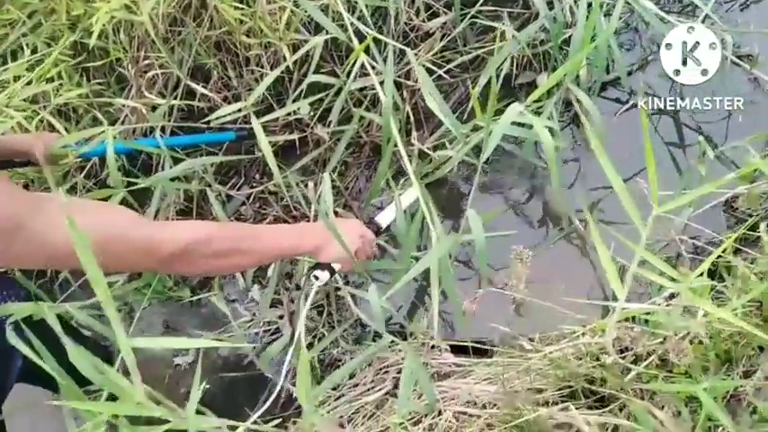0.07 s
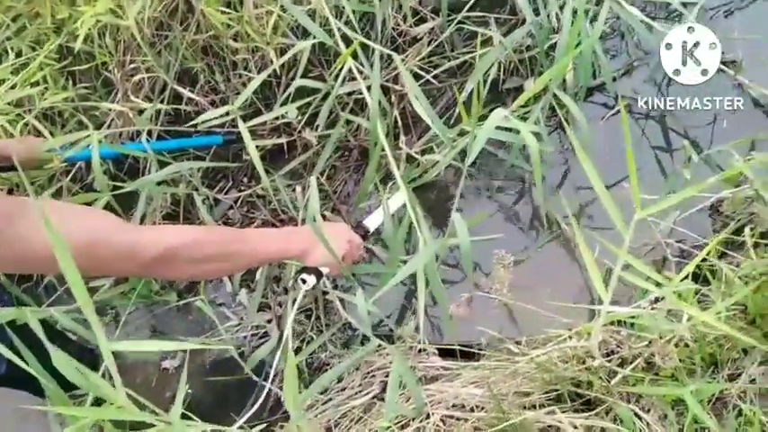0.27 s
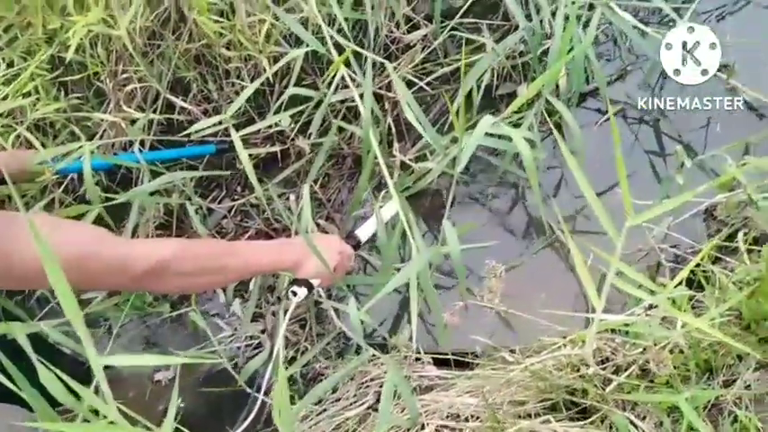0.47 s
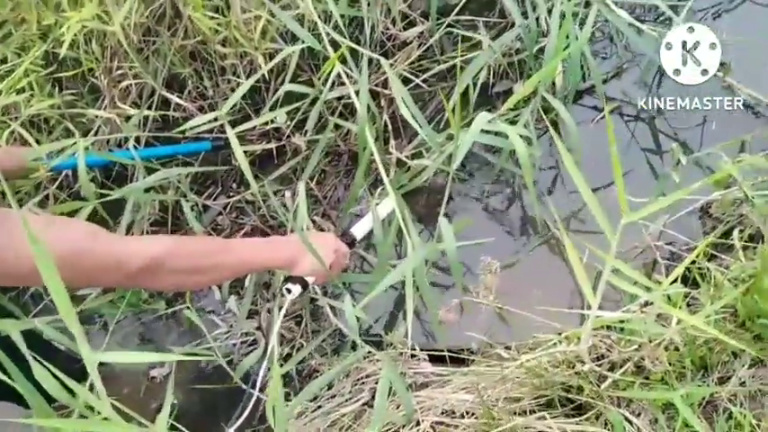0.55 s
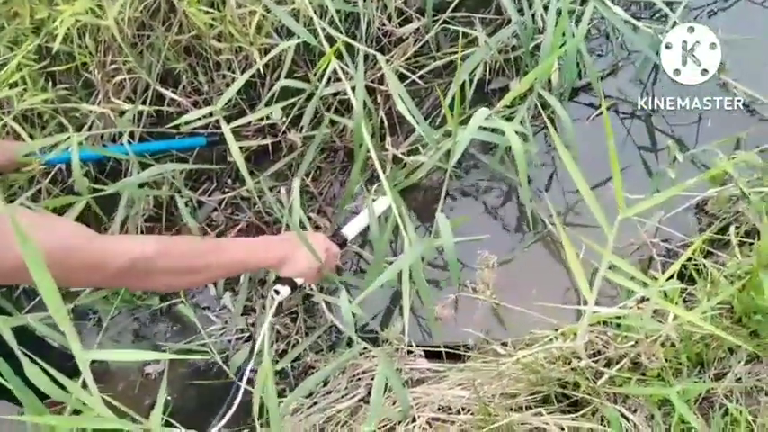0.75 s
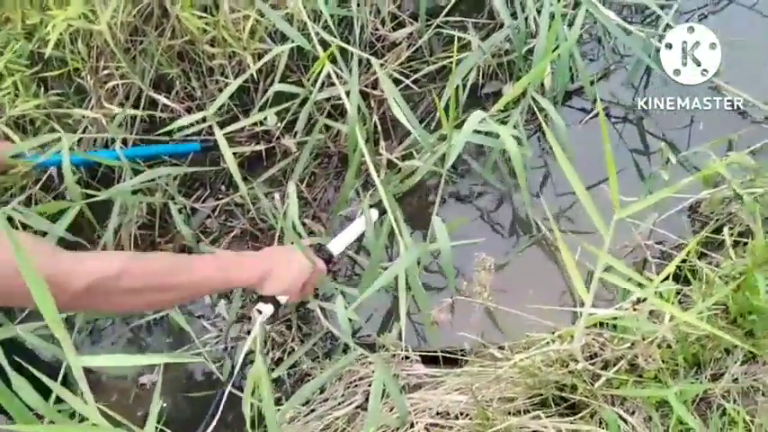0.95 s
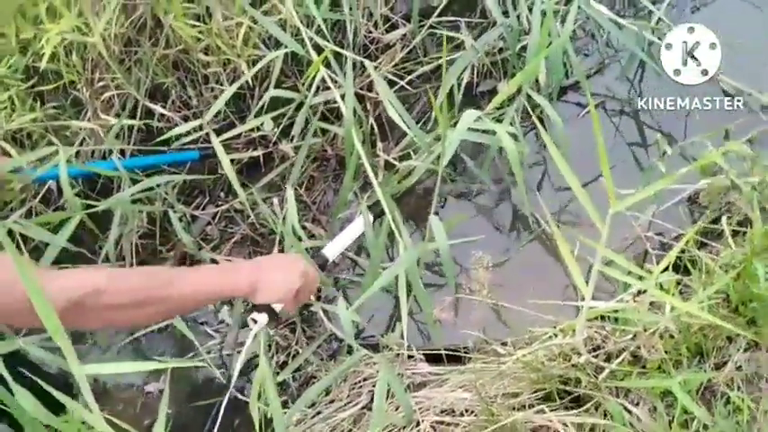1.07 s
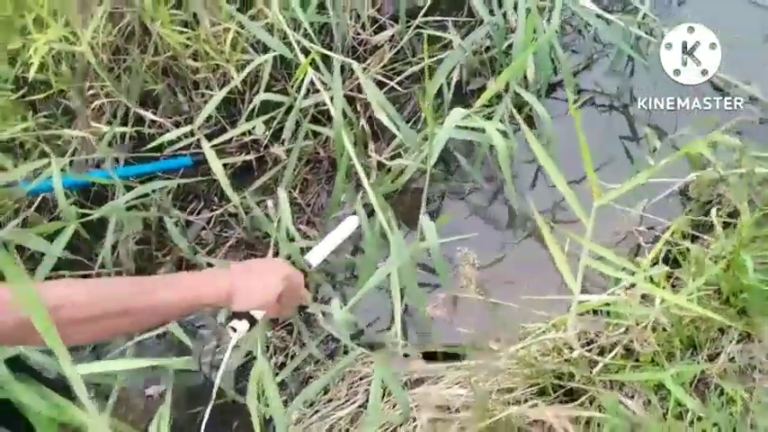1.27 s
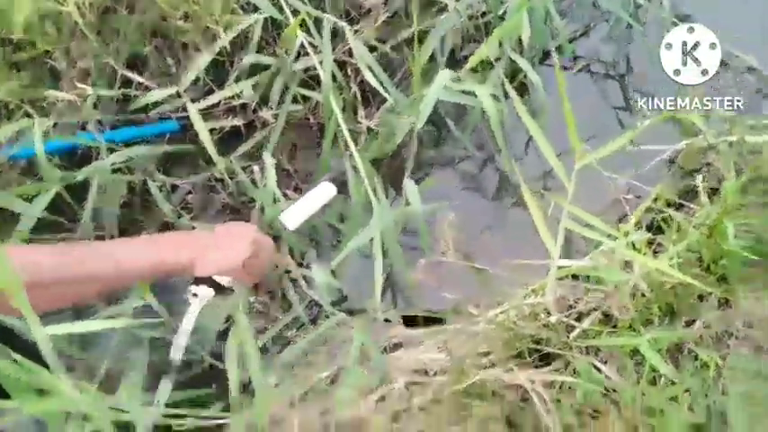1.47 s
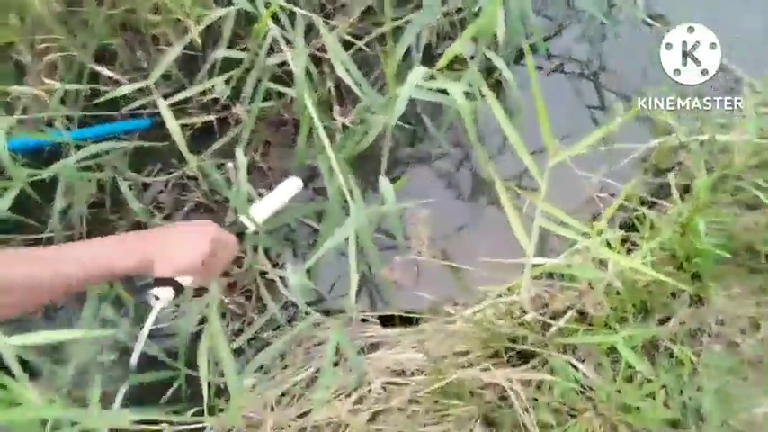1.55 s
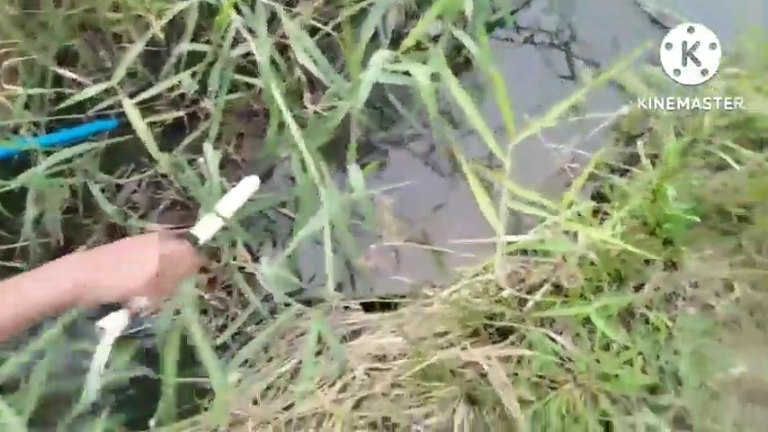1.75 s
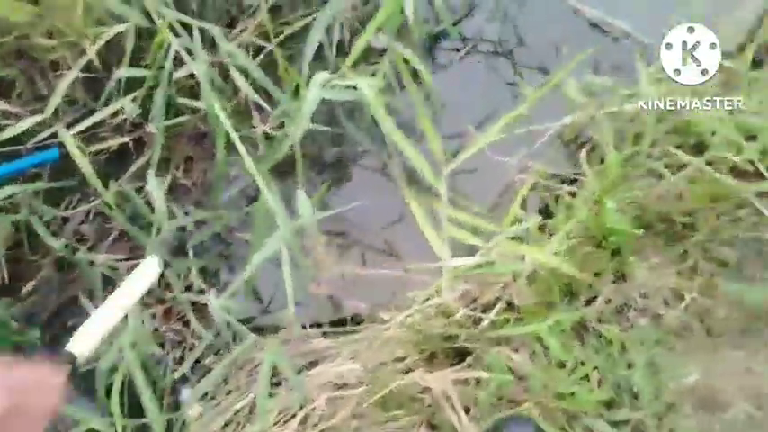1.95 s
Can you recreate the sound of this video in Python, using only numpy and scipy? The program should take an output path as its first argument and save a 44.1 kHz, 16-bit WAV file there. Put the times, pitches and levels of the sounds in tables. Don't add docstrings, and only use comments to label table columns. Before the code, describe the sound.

A harsh electric buzz from a homemade shocker dominates. Until 0.19 s there is only faint grass rustle, a thin throbbing insect and low distant rumble. The dry, metallic rattle then starts, peaks near 0.3 s, flutters unevenly with a slight coil hum, and gradually weakens until stopping at 1.72 s. A soft pole knock at 1.75, a short grass swish at 1.85, tiny bright clicks from 1.87 to 1.95, and a last dull knock follow.

```python
import sys
import numpy as np
from scipy import signal
from scipy.io import wavfile

SR = 44100
rng = np.random.default_rng(int(sys.argv[2]) if len(sys.argv) > 2 else 0)


def elevation(decibels):
    levels = np.asarray(decibels, float)
    return 10 ** (levels / 20)


def to_wav(s):
    ch = np.atleast_2d(s).T
    pcm = np.round(np.clip(ch, -1, 1) * 32767)
    wavfile.write(sys.argv[1], SR, pcm.astype(np.int16))


N = 88200

# (time [s], level [dB], extra path [ms])
RATTLE_PATH = [(.192, -41.5, 0.16), (.2, -29.5, .15), (.225, -25, 0.23), (.3, -19.5, 0.16),
               (.4, -20.5, 0.13), (.5, -20.5, 0.23), (.55, -21, 0.18), (.6, -21.5, 0.16),
               (.64, -22.5, 0.27), (.68, -21, 0.15), (.8, -22.5, 0.17), (.9, -22.5, 0.26),
               (1.0, -23.5, 0.4), (1.2, -24, 0.76), (1.4, -25.5, 0.7), (1.55, -28, 0.41), (1.65, -30, 0.58),
               (1.72, -31.5, 0.25)]
# (first hard strike [s], hard strikes [count], hard-to-soft [dB])
STRIKE_RUNS = [(0.1925, 2, 13.5), (0.2091, 1, 18.3), (0.2191, 11, 10.5), (0.2957, 5, 6.2), (0.3323, 1, 7.7),
               (0.3489, 9, 7.0), (0.4121, 1, 1.7), (0.4221, 3, 6.6), (0.4454, 3, 7.2), (0.4621, 4, 5.5),
               (0.4953, 1, 3.3), (0.5053, 3, 6.4), (0.5819, 1, 4.8), (0.5918, 3, 7.4), (0.6151, 2, 5.7),
               (0.6318, 1, 3.2), (0.6484, 1, 4.2), (0.6584, 2, 8.8), (0.6684, 2, 9.2), (0.6784, 3, 8.2),
               (0.7017, 2, 4.8), (0.7116, 8, 6.3), (0.7616, 5, 6.3), (0.8048, 3, 13.9), (0.8215, 10, 6.9),
               (0.908, 7, 5.5), (0.9779, 3, 6.1), (1.0012, 2, 8.6), (1.0111, 1, 4.7), (1.0211, 4, 3.4),
               (1.0444, 27, 5.1), (1.2274, 3, 7.3), (1.2507, 1, 1.5), (1.2607, 4, 6.9), (1.304, 8, 9.7),
               (1.3805, 8, 6.4), (1.4371, 5, 4.4), (1.4737, 21, 4.8), (1.6201, 2, 4.4), (1.6368, 4, 7.7),
               (1.6667, 7, 8.7), (1.72, 1, 6.2)]
# (frequency [Hz], left level [dB], right level [dB], 60 dB decay time [s])
BOX_MODES = [(5610, 0.5, -15.5, 0.0027), (6252, 3.5, -9, 0.0059), (7022, -20, 1.5, 0.0062),
             (8275, -2, -5, 0.0047), (9820, -53, 4, 0.0017), (10586, -3, -3, 0.0029),
             (11640, -17, -9.5, 0.017), (14200, -37, -43, 0.0025)]
# (frequency [Hz], left level [dB], right level [dB], decay time [s])
CRACK_MODES = [(5735, -2, -0.5, 0.0012), (7316, -1.5, -10, 0.0016), (10557, -4.5, -12.5, 0.0023),
               (12260, -12, -22, 0.0011), (13470, -37, -30, 0.0017)]
# (frequency [Hz], level [dB], 60 dB decay time [s])
CASE_MODES = [(1360, 9, 0.0015), (2160, -6, 0.0091), (3180, -6, 0.0025), (3850, 12, 0.0093),
              (4046, -2.5, 0.014)]
# (multiple of the strike rate [count], level [dB])
HUM_MULTIPLES = [(1, -43), (2, -62.5), (3, -51.5), (4, -64), (5, -40.5), (6, -49), (7, -53.5), (8, -55.5),
                 (9, -107), (10, -55)]
# (time [s], peak level [dB], frequency [Hz])
POLE_KNOCKS = [
    (1.753, -28.5, 327),
    (1.834, -49, 376),
    (1.994, -36.5, 354),
]
# (time [s], peak level [dB], frequency [Hz])
STEM_CLICKS = [
    (1.8721, -25, 7650),
    (1.882, -21, 6850),
    (1.9278, -21, 7100),
    (1.9424, -26, 6900),
    (1.949, -20.5, 6360),
]
# (frequency [Hz], level [dB])
RUSTLE_COLOUR = [(180, -50), (300, 3.5), (401, -6), (1580, -11), (1800, -7), (3060, -4.5), (5570, -3.5),
                 (6040, -0.5), (14200, -8)]
# (time [s], level [dB])
GRASS_LEVEL = [(0, -52), (.08, -60), (.13, -66), (.19, -68), (.25, -57), (.4, -52), (.9, -46), (1.4, -43),
               (1.74, -40), (1.81, -40), (1.85, -38), (1.92, -40.5), (2, -41)]
# (frequency [Hz], level [dB])
RUMBLE_COLOUR = [(15, -69), (25, -24), (81, -2.5), (108, 7.5), (155, -1.5), (179, 5), (401, -11.5),
                 (522, -67), (700, -74), (910, -77), (1540, -120)]
# (time [s], level [dB])
RUMBLE_SWELL = [
    (0, -55),
    (.3, -57.5),
    (.7, -52),
    (1.2, -50),
    (1.5, -50),
    (1.7, -53),
    (2, -52),
]

ON_S, OFF_S, STRIKE_HZ = .1925, 1.7235, 300.5
LEFT_LAG_S = .00039


def rms_one(x):
    return x / np.sqrt(np.mean(x ** 2) + 1e-20)


def in_time(rows, s):
    t, *columns = np.transpose(rows)
    return [np.interp(s, t, c) for c in columns]


def drift(rate_hz):
    every = 40
    r = np.exp(-2 * np.pi * every * rate_hz / SR)
    noise = rng.standard_normal(N // every + 2002)
    slow = signal.lfilter([1], [1, -2 * r, r * r], noise)[2000:]
    return np.interp(np.arange(N) / every, np.arange(len(slow)), rms_one(slow))


def ring(push, hz, t60):
    r = elevation(-60 / (t60 * SR))
    w = 2 * np.pi * hz / SR
    return signal.lfilter([0, np.sin(w)], [1, -2 * r * np.cos(w), r * r], push + 1e-18)


def train(s, size):
    out = np.zeros(N)
    spots = np.round(np.asarray(s) * SR).astype(int)
    np.add.at(out, np.clip(spots, 0, N - 1), size)
    return out


def banded(source, colour, alike_hz, patchy_db):
    out, edges, points = 0, 22 * 2 ** np.arange(0, 9.6, .5), np.array(colour)
    for k, (low, high) in enumerate(zip(edges, edges[1:])):
        hz = np.sqrt(low * high)
        if points[0, 0] <= hz <= points[-1, 0]:
            band = signal.butter(2, [low, high], "band", fs=SR, output="sos")
            mid, side = signal.sosfilt(band, source[k % 2])
            alike = .95 / (1 + (hz / alike_hz) ** 2)
            level_db = np.interp(np.log(hz), np.log(points[:, 0]), points[:, 1])
            gain = elevation(level_db + patchy_db * drift(17))
            out = out + gain * (np.sqrt(1 + alike) * mid + np.sqrt(1 - alike) * side * [[1], [-1]])
    return rms_one(out)


def rattle():
    s, db = strikes()
    box = struck(BOX_MODES, s + .0002, db + 4.5, spread_s=.00004, wander_db=1.9, order=1)
    crack = struck(CRACK_MODES, s, db + 21, spread_s=0, wander_db=.5, order=2)
    treble = signal.cheby2(8, 40, 4550, "high", fs=SR, output="sos")
    out = signal.sosfilt(treble, box + crack)
    case_modes = [(hz, d, d - 2.5, t60) for hz, d, t60 in CASE_MODES]
    case_db = 0.46 * (db + 23) - 35
    case = struck(case_modes, s, case_db, spread_s=.00031, wander_db=3.5, order=1)
    out += signal.sosfilt(signal.butter(2, [1100, 4400], "band", fs=SR, output="sos"), case)
    return out + scattered(out)


def strikes():
    hard_share = .45
    k = np.arange(int((OFF_S - ON_S) * STRIKE_HZ) + 1)
    jitter, scatter = rng.standard_normal((len(k), 2)).T
    swing = np.full(len(k) + 3, np.nan)
    for first_s, hard, uneven_db in STRIKE_RUNS:
        first = int(round((first_s - ON_S) * STRIKE_HZ))
        end = first + 2 * int(hard)
        if first > 1 and swing[first - 2] < 0:
            swing[first - 1] = swing[first - 2]
        swing[first:end:2] = hard_share * uneven_db
        swing[first + 1:end:2] = (hard_share - 1) * uneven_db
    swing = np.nan_to_num(swing[:len(k)])
    s = ON_S + k / STRIKE_HZ
    level_db, path_ms = in_time(RATTLE_PATH, s)
    late_ms = path_ms + .03 * jitter + .17 * swing / 10
    s = s - .0003 + late_ms / 1000
    scatter_db = 1.5 * scatter * (0.67 + np.clip(-swing / 4, 0, 1))
    return s, level_db + swing + scatter_db


def struck(modes, s, db, spread_s, wander_db, order):
    facing_s, facing_span_s, facing_hz, facing_peak_db = .99, .29, 8380, 7.5
    lean_left_db = .4
    out = np.zeros((2, N))
    for k, (hz, left_db, right_db, t60) in enumerate(modes):
        away = ((s - facing_s) / facing_span_s) ** 2 + (np.log(hz / facing_hz) / .041) ** 2
        wander = wander_db * drift(10.6)[(s * SR).astype(int)]
        share_db = facing_peak_db * np.exp(-away) + wander + 1.2 * rng.standard_normal(len(s))
        size = (-1) ** k * elevation(db + share_db)
        late = s + spread_s * rng.random(len(s))
        rung = ring(np.array([train(late, size), train(late - LEFT_LAG_S, size)]), hz, t60)
        for _ in range(order):
            rung = swell(rung, hz)
        out += elevation([[left_db + lean_left_db], [right_db - lean_left_db]]) * rung
    return out


def swell(x, hz):
    contact_t60_s = .0021
    return 2 * (1 - elevation(-60 / (contact_t60_s * SR))) * ring(x, hz, contact_t60_s)


def scattered(x):
    t60_s, tail_db = .04, -7.5
    t = np.arange(SR // 5) / SR
    tail = rng.standard_normal((2, len(t))) * elevation(-60 * t / t60_s) * (t > .001)
    tail /= np.sqrt(np.sum(tail ** 2, axis=1, keepdims=True))
    return elevation(tail_db) * signal.fftconvolve(x, tail, axes=1)[:, :N]


def hum():
    grows_db_per_s, waver_db = 6.0, 2.43
    t = np.arange(N) / SR
    on = np.clip((t - ON_S) / 0.072, 0, 1) * np.clip((OFF_S - t) / 0.0069, 0, 1)
    path_s = in_time(RATTLE_PATH, t)[1] / 1000
    heard = np.array([t - path_s, t - path_s + LEFT_LAG_S])
    out = 0
    for m, db in HUM_MULTIPLES:
        growth_db = (m > 1) * grows_db_per_s * (t - 1.5)
        gain = elevation(db - 2.5 + growth_db + waver_db * drift(37))
        out = out + gain * np.sin(2 * np.pi * (m * STRIKE_HZ * heard + rng.random()))
    return on * out


def small_hits():
    clicks = sum(ring(train([s], elevation(db)), hz, .0056) for s, db, hz in STEM_CLICKS)
    knocks = sum(ring(train([s], elevation(db)), hz, .03) for s, db, hz in POLE_KNOCKS)
    return clicks * elevation([[-1.5], [-5.5]]) + signal.lfilter([.1], [1, -.9], knocks)


def swish():
    middle_s, span_s, level_db = 1.846, .0072, -32
    t = np.arange(N) / SR
    hiss = rms_one(ring(rng.standard_normal((2, N)), 6260, .012))
    return elevation(level_db) * np.exp(-((t - middle_s) / span_s) ** 2 / 2) * hiss


def grass():
    snaps_per_s, snap_share = 1300, .24
    snaps = (rng.random((2, 2, N)) < snaps_per_s / SR) * rng.laplace(size=(2, 2, N))
    source = rng.standard_normal((2, 2, N)) + snap_share * rms_one(snaps)
    level_db = in_time(GRASS_LEVEL, np.arange(N) / SR)[0]
    return elevation(level_db) * banded(source, RUSTLE_COLOUR, alike_hz=800, patchy_db=1.54)


def insect():
    centre_hz, half_width_hz, throb_hz, level_db = 7650, 510, 58, -47
    edges = [centre_hz - half_width_hz, centre_hz + half_width_hz]
    sos = signal.butter(2, edges, "band", fs=SR, output="sos")
    throb = 1 + 0.25 * np.sin(2 * np.pi * throb_hz * np.arange(N) / SR)
    return elevation(level_db) * rms_one(throb * signal.sosfilt(sos, rng.standard_normal((2, N))))


def rumble():
    level_db = in_time(RUMBLE_SWELL, np.arange(N) / SR)[0]
    noise = rng.standard_normal((2, 2, N))
    return elevation(level_db) * banded(noise, RUMBLE_COLOUR, alike_hz=920, patchy_db=2.0)


def scene():
    far = rumble()
    shocker = rattle() + hum()
    pole = small_hits() + swish()
    surroundings = (grass() + insect() + far) * elevation([[.7], [-.7]])
    return shocker + pole + surroundings


def top_cut(x):
    return signal.sosfilt(signal.butter(12, 15670, fs=SR, output="sos"), x)


def record(dry):
    limit = 1.2
    rounded = limit * np.tanh(dry / limit)
    top = signal.butter(4, 14300, fs=SR, output="sos")
    return top_cut(signal.sosfilt(top, rounded))


dry = scene()
out = record(dry)
to_wav(out)
```